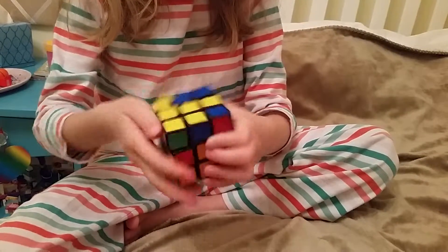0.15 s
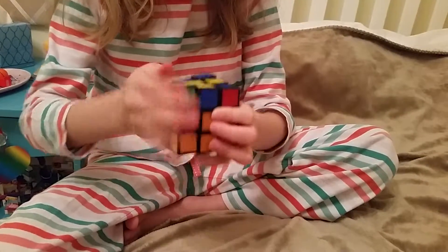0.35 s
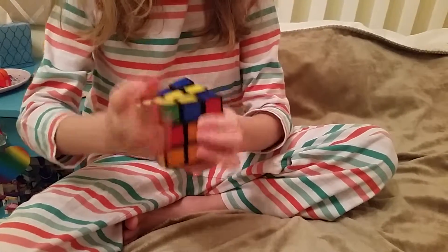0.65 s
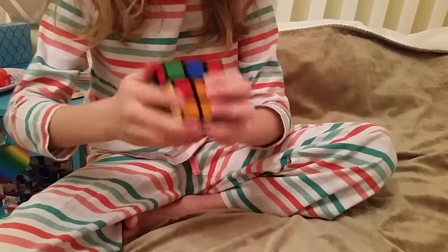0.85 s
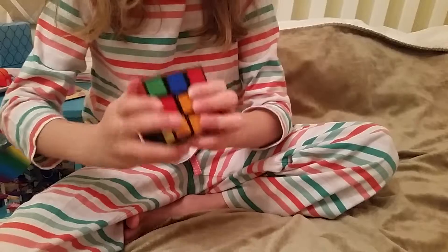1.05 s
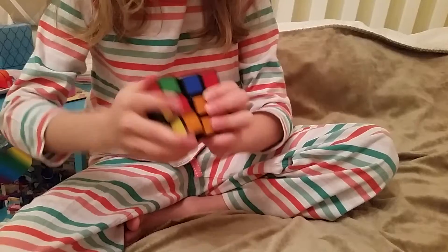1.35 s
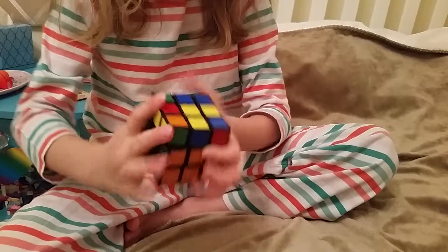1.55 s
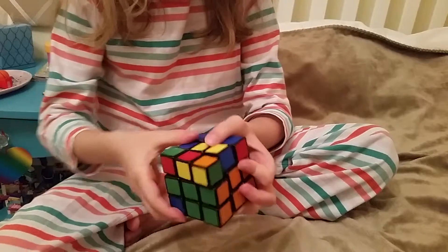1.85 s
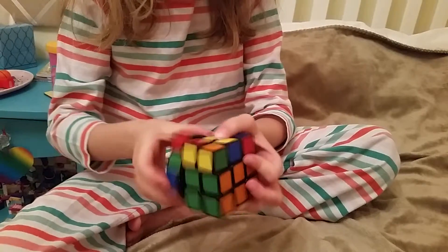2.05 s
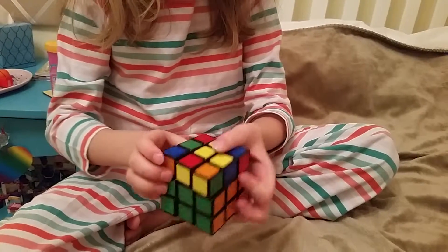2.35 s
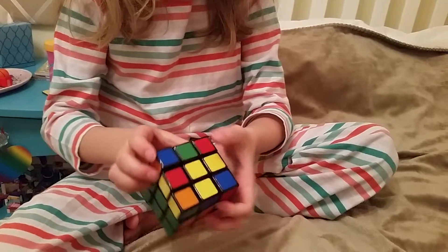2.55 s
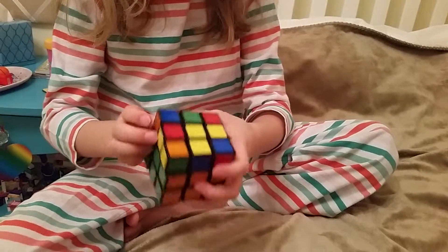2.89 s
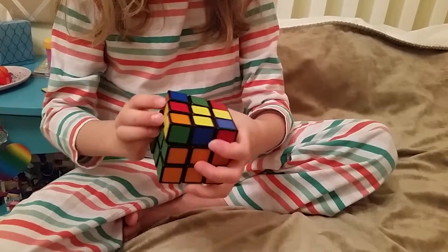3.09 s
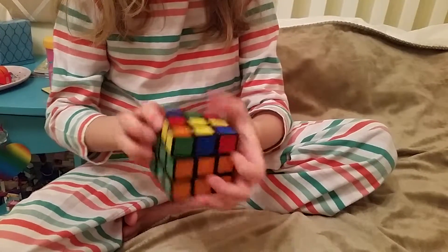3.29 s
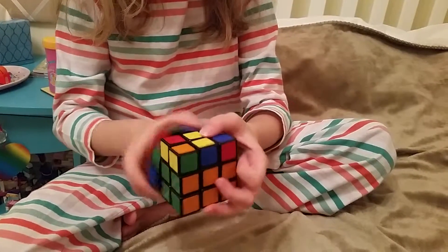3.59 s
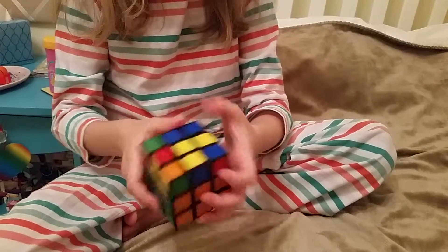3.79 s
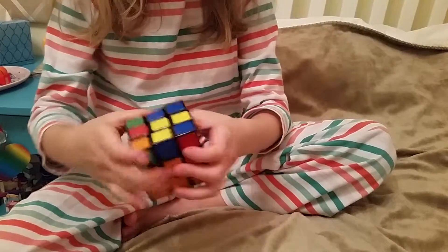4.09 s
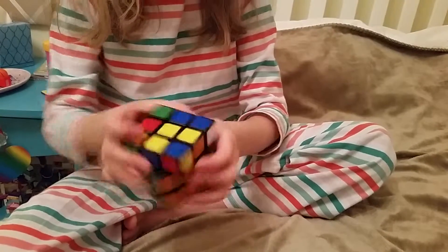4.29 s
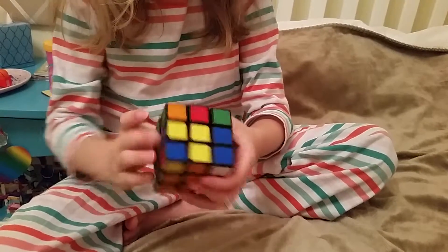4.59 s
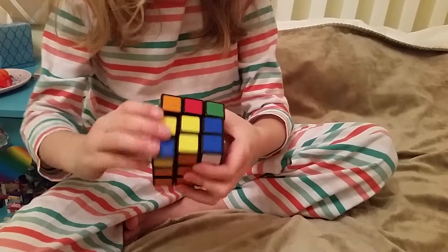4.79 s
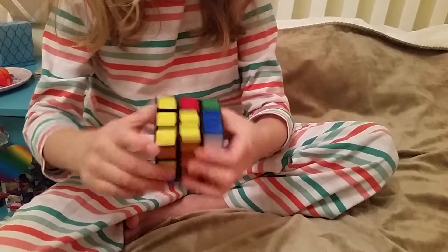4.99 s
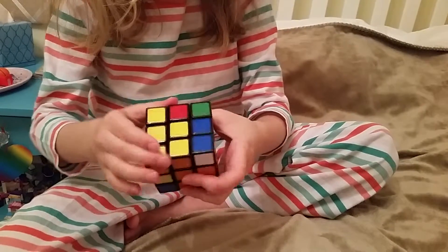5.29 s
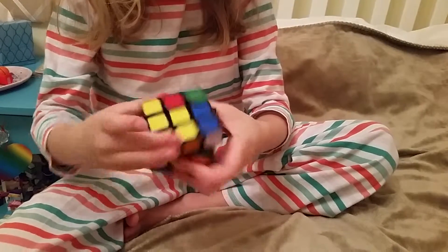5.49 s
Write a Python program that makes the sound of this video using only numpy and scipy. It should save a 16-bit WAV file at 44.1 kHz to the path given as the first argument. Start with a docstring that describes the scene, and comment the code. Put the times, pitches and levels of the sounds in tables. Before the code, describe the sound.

A plastic puzzle cube is twisted by hand close to the microphone in a quiet, softly furnished bedroom. Its layers slide with short scrapes and rattles, then snap into place with small hollow clicks. The turns come in uneven clusters, loudest early on, drop to a brief lull midway, then resume and carry on to the end. A faint low rumble and electrical hum lie underneath.

```python
"""A plastic puzzle cube is twisted by hand in a soft bedroom, close to a pair of microphone ports.
From the start, room rumble and a mains hum lie below. A layer slides and its loose pieces scrape and
rattle, then it snaps into place: a cluster of impacts rings the plastic and the air pockets inside.
The turns go on, loudest near 1.5 s, and from 2 s a rubbing edge now and then whistles thinly. After a
lull near 3 s the turning resumes. Throughout, a suppressor lets the bass swell only as the cube sounds."""
import sys
import numpy as np
from scipy import signal
from scipy.fft import rfft, irfft, next_fast_len
from scipy.io import wavfile
from scipy.ndimage import uniform_filter1d

SR = 44100
rng = np.random.default_rng(int(sys.argv[2]) if len(sys.argv) > 2 else 0)


def unload_wav(signal):
    """Save mono or channel-first audio to the path in sys.argv[1] as 16-bit WAV at rate SR, clipped to [-1, 1]."""
    wavfile.write(
        sys.argv[1],
        SR,
        np.round(np.clip(np.atleast_2d(signal).T, -1, 1) * 32767).astype(np.int16),
    )


N = 248724


def from_db(db):
    """Amplitude ratio of a level in decibels."""
    return 10 ** (np.asarray(db) / 20)


def unit_rms(x):
    """Normalisation to an rms of 1."""
    return x / np.sqrt(np.mean(x ** 2) + 1e-20)


def at_hz(points, hz):
    """Interpolation of a spectrum on a logarithmic frequency axis."""
    frequencies, values = np.transpose(points)
    return np.interp(np.log(hz + 1), np.log(frequencies), values)


def drift(rate_hz):
    """Low-pass filtered noise: a slow random fluctuation with an rms of 1."""
    step = 40
    pole = np.exp(-2 * np.pi * rate_hz * step / SR)
    noise = rng.standard_normal(N // step + 2002)
    slow = signal.lfilter([1], [1, -2 * pole, pole * pole], noise)[2000:]
    return np.interp(np.arange(N) / step, np.arange(len(slow)), unit_rms(slow))


def ring(force, hz, t60):
    """Damped harmonic oscillator: a unit impulse starts a unit sine that falls 60 dB in t60 seconds."""
    r, w = from_db(-60 / (t60 * SR)), 2 * np.pi * hz / SR
    return signal.lfilter([0, np.sin(w)], [1, -2 * r * np.cos(w), r * r], force + 1e-18)


# Rumble and hiss of the room. Each row: frequency in Hz, relative spectral density in dB.
ROOM_SPECTRUM = [(15, -28), (30, -6), (55, -10), (95, -1), (150, -10), (195, -9.5), (260, -19),
                 (450, -29.5), (640, -33), (1000, -45), (2000, -53.5), (4400, -63), (16000, -57.5)]
# Likeness of that noise at the two ports. Each row: frequency in Hz, correlation from 0 to 1.
ROOM_COHERENCE = [(30, 1), (130, 0.036), (300, 0.78), (1000, 0.66), (16000, 0.012)]

def room_tone(noise_db=-58.5, hum_hz=120.9, hum_db=-57.5):
    """Partial coherence: shared and opposed noise mix at the two ports, under a wavering mains hum."""
    hz = np.arange(N // 2 + 1) * SR / N
    coherence = np.clip(at_hz(ROOM_COHERENCE, hz), 0, 1)
    mid, side = rfft(rng.standard_normal((2, N))) * from_db(at_hz(ROOM_SPECTRUM, hz))
    noise = irfft(np.sqrt(1 + coherence) * mid + np.sqrt(1 - coherence) * side * [[1], [-1]], N)
    phase = 2 * np.pi * hum_hz * np.arange(N) / SR + 0.23 * drift(5.3)
    hum = np.sin(phase) * from_db(hum_db + 2.1 * drift(5.6))
    return from_db(noise_db) * unit_rms(noise) + hum


# A layer slides or the grip shifts. Each row: start in seconds, length in seconds,
# initial rattle level in dB, treble share in dB.
SLIDE_EVENTS = [(0.0, 0.06, -54, -9.5), (0.14, 0.085, -73.5, -12.5), (0.244, .05, -66, -23),
                (0.295, 0.011, -45.5, 1), (0.436, 0.095, -50.5, -6.5), (0.751, 0.14, -75.5, -15.5),
                (0.919, 0.12, -64.5, -14.5), (1.212, 0.14, -56, -6), (1.39, 0.023, -54.5, -13),
                (1.433, 0.034, -43.5, -2.5), (1.509, 0.026, -28, 2), (1.838, 0.075, -68.5, -14.5),
                (2.025, 0.05, -59, -17), (2.16, 0.0484, -58.5, -21), (2.204, 0.019, -34.5, -0.5),
                (2.35, 0.0041, -54, -12), (2.546, 0.0085, -72.5, -20), (2.994, 0.01, -77.5, -26.5),
                (3.097, 0.026, -82.5, -25.5), (3.257, 0.031, -82.5, -26), (3.336, 0.04, -73, -20),
                (3.389, 0.033, -64, -11.5), (3.499, .055, -71, -21), (3.554, 0.024, -61.5, -10),
                (3.664, 0.079, -52, -10), (3.946, 0.186, -78, -21.5), (4.1, 0.062, -66.5, -21),
                (4.235, .085, -62.5, -25), (4.321, 0.03, -53.5, -11.5), (4.411, 0.051, -45.5, -4),
                (4.59, 0.14, -77, -11), (4.856, 0.032, -55, -8.5), (5.075, 0.054, -41.5, -2.5),
                (5.401, .005, -59, -11), (5.477, 0.039, -63.5, -11.5), (5.599, 0.07, -49.5, -12.5)]

def rattle_envelopes(swell_db_per_s=39, attack_s=0.0046):
    """Exponential growth and decay in body, edges and top octave; the loudest slide or snap prevails."""
    shaken_by_snaps = [(s, 0, db - 21.5, -5 + 0.3 * treble_db) for s, db, treble_db, _ in SNAP_EVENTS]
    level_db = np.full((3, N), -200.)
    for start, length, db, treble_db in SLIDE_EVENTS + shaken_by_snaps:
        i = max(round(start * SR), 0)
        t = np.arange(min(SR // 2, N - i)) / SR
        after = np.maximum(t - length, 0)
        fade_db_per_s = 135 + 899 * length   # the longer the slide, the faster its fade
        body = db + swell_db_per_s * (t - after) - fade_db_per_s * after
        body -= 6 * (1 - np.exp(-after / 0.055))   # the fade opens with a quicker drop
        edges = body + treble_db - 19.5 * after   # higher bands die sooner
        top = edges - 63 * after
        span = slice(i, i + len(t))
        level_db[:, span] = np.maximum(level_db[:, span], [body, edges, top])
    pole = np.exp(-1 / (attack_s * SR))
    return signal.lfilter([1 - pole], [1, -pole], from_db(level_db))


def scrape(modes, per_s, spread_db):
    """Shot noise: tiny random contacts, clumped in time, each excite one mode; rms 1."""
    sizes = from_db(spread_db * np.minimum(rng.exponential(1, N), 5)) * rng.choice([-1, 1], N)
    contacts = rng.random(N) < per_s * from_db(2.2 * drift(60)) / SR
    struck_mode = rng.integers(0, len(modes), N)
    out = np.zeros(N)
    for k, (hz, db, t60) in enumerate(modes):
        grip_db = 4.1 * drift(8.0)   # the grip damps now one mode, now another
        out += from_db(db + grip_db) * ring(sizes * contacts * (struck_mode == k), hz, t60)
    return unit_rms(out)


def ticks(modes, per_s, spread_db):
    """Impulse excitation: each sparse knock of a loose piece rings all modes at once; rms 1."""
    contacts = rng.random(N) < per_s / SR
    knocks = contacts * from_db(spread_db * np.minimum(rng.exponential(1, N), 3))
    strength = rng.standard_normal(N)
    out = np.zeros(N)
    for k, (hz, db, t60) in enumerate(modes):
        out += ring(from_db(db) * knocks * np.roll(strength, k), hz, t60)
    return unit_rms(out)


# Response of the thin edges of the pieces. Each row: frequency in Hz, relative level in dB.
EDGE_SPECTRUM = [(4200, -6), (5400, -12.5), (6500, -4.5), (7800, -2), (9000, 6), (10000, 2), (12000, 3.5),
                 (15600, -8)]

def edge_modes(cycles):
    """Constant-Q resonances: sixteen treble modes each fall 60 dB in the same number of cycles."""
    return [(hz, at_hz(EDGE_SPECTRUM, hz), cycles / hz) for hz in np.geomspace(4200, 15600, 16)]


# Higher air pockets between the pieces. Each row: multiple of the lowest pocket's frequency,
# added frequency in Hz, relative level in dB.
UPPER_POCKETS = [(1.64, 0, -9.5), (0, 2679.5, -12)]

def rubbed_pockets(width_hz=45):
    """Forced resonance: friction keeps the air pockets sounding near the last snap's pitches; rms 1."""
    starts, _, _, pocket_hz = np.transpose(SNAP_EVENTS)
    last_snap = np.maximum(np.searchsorted(starts, np.arange(N) / SR) - 1, 0)
    pole = np.exp(-np.pi * width_hz / SR)
    out = np.zeros(N)
    for multiple, plus_hz, db in [(0.96, 0.0091, 0.016)] + UPPER_POCKETS:
        phase = 2 * np.pi * np.cumsum(multiple * pocket_hz[last_snap] + plus_hz) / SR
        in_phase, quadrature = signal.lfilter([1], [1, -pole], rng.standard_normal((2, N)))
        out += from_db(db) * (in_phase * np.cos(phase) + quadrature * np.sin(phase))
    return unit_rms(out)


# Modes of the hollow pieces and core. Each row: frequency in Hz, relative level in dB,
# time to fall 60 dB in seconds.
BODY_MODES = [(1080, -2.5, 0.02), (1270, -10, 0.0075), (1400, -5.5, 0.019), (1640, -5, 0.013),
              (1747, -8, 0.017), (1950, -8.5, 0.013), (2463, -9, 0.014), (2820, -5, 0.0055),
              (3275, -8.5, 0.0075), (3590, -14, 0.01)]

def rattle():
    """Friction and impact: pieces slide and knock as a layer turns, exciting modes in three bands."""
    edge = edge_modes(cycles=18)
    body = scrape(BODY_MODES, per_s=1800, spread_db=2.0)
    body += from_db(-5.5) * ticks(BODY_MODES, per_s=150, spread_db=1.0)
    body_gain, edge_gain, top_gain = rattle_envelopes()
    brightness = np.clip(edge_gain / (body_gain + 1e-12), from_db(-25), 1)
    body += from_db(-3.5) * brightness ** -0.25 * rubbed_pockets()   # stronger in a dull rattle
    edges = from_db(-2.5) * scrape(edge[:9], per_s=3600, spread_db=-0.5)
    top = from_db(-2.5) * scrape(edge[9:], per_s=2800, spread_db=2.0)
    top += from_db(-10.5) * ticks(edge, per_s=46, spread_db=4.5)
    return body_gain * body + edge_gain * edges + top_gain * top


def strikes(contacts, modes, level_db):
    """Modal superposition: the contacts of a snap strike every mode, each with a random strength."""
    out = np.zeros(N)
    for hz, db, t60 in modes:
        strength = rng.uniform(-1, 1, contacts.shape)
        strength /= np.sqrt(np.sum(strength ** 2, axis=1, keepdims=True))
        force = np.zeros(N)
        np.add.at(force, contacts, from_db(level_db + db)[:, None] * strength)
        out += ring(force, hz, t60)
    return out


# Pieces snapping together. Each row: start in seconds, level in dB, treble share in dB,
# frequency of the lowest air pocket in Hz.
SNAP_EVENTS = [(0.044, -50.5, 7, 1080), (0.261, -46, -34, 1047), (0.272, -32.5, -18, 1029),
               (0.296, -21.5, -11, 1080), (0.411, -42, -9, 1080), (0.43, -40, -15, 1101),
               (0.437, -26, -7.5, 1200), (0.49, -35.5, -6, 1098), (0.504, -36, -15, 1094),
               (0.526, -31, -24, 1081), (0.546, -40, -25, 1197), (0.626, -43.5, -20, 1257),
               (0.752, -48, -31, 1132), (0.916, -47, -15, 1110), (0.956, -38, -25, 1028),
               (0.982, -32, -26, 1080), (1.106, -48, -8.5, 1098), (1.122, -35.5, -13, 1193),
               (1.212, -54, -22, 1092), (1.244, -31.5, -8.5, 1210), (1.303, -35, -1.5, 1091),
               (1.314, -30, -10, 1080), (1.33, -37, -1.5, 1080), (1.414, -30, -13.5, 1136),
               (1.435, -13.5, -8.5, 1000), (1.486, -36, 0, 1303), (1.509, -6.5, -2.5, 1270),
               (1.527, -13.5, -5.5, 1270), (1.757, -35, -20.5, 1080), (1.879, -50.5, -18, 1004),
               (1.961, -47, -31.5, 967.5), (2.002, -45, -37, 1123), (2.025, -41, -22.5, 955.8),
               (2.158, -41.5, -23, 1080), (2.2014, -15.5, -10.5, 1113), (2.219, -22, -16, 1106),
               (2.223, -22, -17, 1051), (2.35, -39.5, -8, 1560), (2.646, -55.5, -32, 1040),
               (2.784, -59.5, -29, 1043), (2.992, -58.5, -27.5, 1051), (3.1, -60, -23, 1025),
               (3.388, -42, -16, 1009), (3.526, -48.5, -19, 976), (3.554, -39, -23, 1131),
               (3.607, -49, -34, 1150), (3.659, -26.5, -21, 991.4), (3.706, -31.5, -12.5, 1009),
               (3.746, -32, -20, 1024), (4.099, -39.5, -28, 1080), (4.147, -43.5, -25, 1056),
               (4.172, -40.5, -36, 977), (4.235, -39, -32, 1080), (4.297, -44, -18, 1045),
               (4.32, -34, -21, 1119), (4.399, -32, -14, 1109), (4.41, -33, -3, 1055),
               (4.412, -22, -18, 1052), (4.427, -21.5, -16, 938), (4.449, -27, -2, 1400),
               (4.644, -47.5, -18.5, 1202), (4.67, -48.5, -18.5, 1049), (4.704, -42, -21.5, 984),
               (4.779, -39, -11.5, 960), (4.856, -34.5, -10, 1030), (4.901, -35, -22, 1050),
               (4.961, -42, -24.5, 1080), (5.079, -25.5, -16, 1045), (5.1, -22, -11, 1111),
               (5.193, -30, -15, 1010), (5.286, -34.5, -19.5, 946.6), (5.357, -38, -15.5, 1080),
               (5.401, -31, -4.5, 902), (5.596, -33, -16, 1224)]

def snaps(cluster_s=0.0045):
    """Impact sound: five contacts in quick succession ring body and edges over a hollow knock."""
    starts, level_db, treble_db, _ = np.transpose(SNAP_EVENTS)
    delays = cluster_s * rng.random((len(starts), 5, 2)).mean(axis=2)
    contacts = np.minimum(((starts[:, None] + delays) * SR).astype(int), N - 1)
    damped_modes = [(hz, db, 0.23 * t60) for hz, db, t60 in BODY_MODES]
    body = strikes(contacts, damped_modes, level_db - 10.0)
    edges = strikes(contacts, edge_modes(cycles=22), level_db + treble_db - 9.0)
    return hollow_knocks() + body + edges


def hollow_knocks(t60=0.014, rise_s=0.00093):
    """Cavity resonance: air pockets ring at each snap; how the pieces lie sets the lowest pitch."""
    out, t = np.zeros(N + SR), np.arange(int(.05 * SR)) / SR
    envelope = from_db(-60 * t / t60) * (1 - np.exp(-t / rise_s)) ** 2
    scatter = rng.standard_normal((len(SNAP_EVENTS), len(UPPER_POCKETS), 2))
    for (start, db, _, lowest_hz), draws in zip(SNAP_EVENTS, scatter):
        knock = np.sin(2 * np.pi * lowest_hz * t)
        for (multiple, plus_hz, pocket_db), (louder, higher) in zip(UPPER_POCKETS, draws):
            hz = (multiple * lowest_hz + plus_hz) * (1 + 0.036 * higher)
            knock += from_db(pocket_db + 0.99 * louder) * np.sin(2 * np.pi * hz * t)
        i = round(start * SR)
        out[i:i + len(t)] += from_db(db) * envelope * knock
    return out[:N]


# An edge rubs and whistles thinly. Each row: start in seconds, level in dB, pitch in Hz.
WHISTLE_EVENTS = [(2.041, -78, 6640), (4.101, -84.5, 6270), (4.236, -92, 6630), (5.397, -56.5, 6380)]

def whistles(fade_t60=0.22):
    """Resonant filtering: friction noise sounds through one narrow edge mode and dies away."""
    out, t = np.zeros(N), np.arange(N) / SR
    for start, db, hz in WHISTLE_EVENTS:
        tone = unit_rms(ring(rng.standard_normal(N), hz, t60=.012))
        envelope = (t > start) * from_db(db - 60 * np.maximum(t - start, 0) / fade_t60)
        out += envelope * tone
    return out


def radiated(x, cutoff_hz=930):
    """Radiation efficiency: a small cube radiates long waves poorly, so only a trace of thump remains."""
    treble = signal.sosfilt(signal.butter(8, cutoff_hz, "high", fs=SR, output="sos"), x)
    thump = signal.sosfilt(signal.butter(2, [260, 600], "band", fs=SR, output="sos"), x)
    return treble + from_db(-24.0) * thump


def bedroom(x, t60=0.19, wall_cutoff_hz=14000):
    """Reverberation: eight feedback delays a side, dulled by wall absorption on every round."""
    size = next_fast_len(N + SR // 2)
    unit_delay = np.exp(-2j * np.pi * np.arange(size // 2 + 1) / size)
    pole = np.exp(-2 * np.pi * wall_cutoff_hz / SR)
    wall = (1 - pole) / (1 - pole * unit_delay)
    response = np.zeros((2, len(unit_delay)), complex)
    for k, lag in enumerate((rng.uniform(.009, .03, 16) * SR).astype(int)):
        loop = from_db(-60 * lag / SR / t60) * wall * unit_delay ** lag
        response[k % 2] += loop / (1 - loop) * (-1) ** (k // 2)
    return irfft(response * rfft(x, size), size)[:, :N]


# Colour of the microphone ports. Each row: frequency in Hz, level of left over right in dB.
PORT_BALANCE = [(60, -2.5), (140, -4.5), (400, -13), (1170, -11), (2740, -10.5), (4190, -7.5), (6410, -13),
                (8200, -7.5), (9810, 1.5), (12000, 2.5), (15000, -10)]

def ports(x, right_delay_s=0):
    """Level and time differences: each port has its own colour, and sound may reach the right later."""
    hz = np.arange(N // 2 + 1) * SR / N
    tilt = from_db(at_hz(PORT_BALANCE, hz) / 2)
    delay = np.exp(-2j * np.pi * hz * right_delay_s)
    return irfft(rfft(x) * [tilt, delay / tilt], N)


def scene():
    """Superposition: the cube's direct sound, its reverberation and the room tone add at the ports."""
    cube = radiated(from_db(-9.0) * rattle() + from_db(-2.5) * snaps() + whistles())
    side = radiated(from_db(-12.5) * rattle())   # faces of the cube that the ports hear differently
    direct = ports(cube + side * [[1], [-1]], right_delay_s=.000297)
    reverberation = from_db(-17) * ports(bedroom(cube))
    return from_db(7.0) * (direct + reverberation) + ports(room_tone())


def record(dry, crossover_hz=800, threshold_db=-60.5, depth_db=-11.0, cutoff_hz=16700):
    """Noise gating: the bass is turned down while little sounds above it; a low-pass cuts the top."""
    bass = signal.sosfiltfilt(signal.butter(4, crossover_hz, fs=SR, output="sos"), dry)
    treble = dry - bass
    treble_db = 10 * np.log10(uniform_filter1d(np.mean(treble ** 2, 0), size=1500) + 1e-12)
    opening = 1 / (1 + np.exp(-(treble_db - threshold_db) / 6.2))
    opening = uniform_filter1d(opening, int(.25 * SR))
    gated = treble + bass * from_db(depth_db * (1 - opening))
    rounded = np.tanh(gated)   # softens the loudest peaks
    return signal.sosfilt(signal.cheby2(10, 50, cutoff_hz, fs=SR, output="sos"), rounded)


dry = scene()
out = record(dry)
unload_wav(out)
```